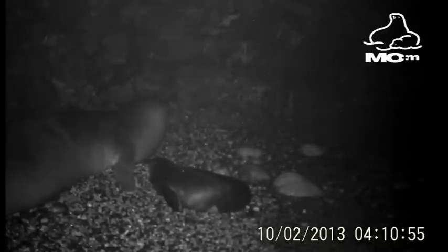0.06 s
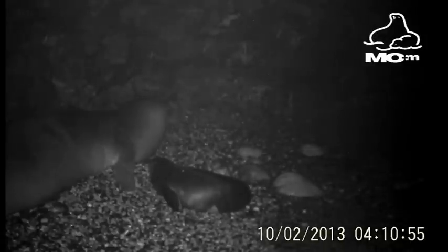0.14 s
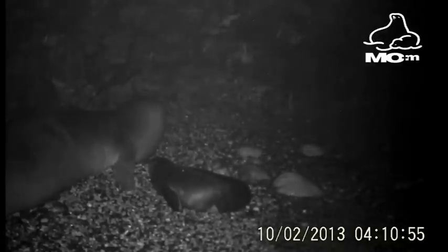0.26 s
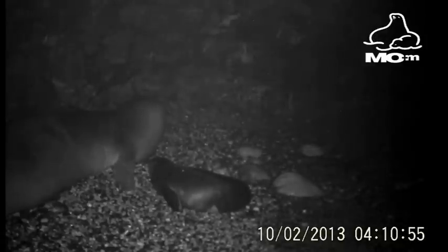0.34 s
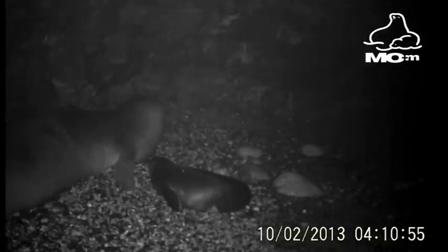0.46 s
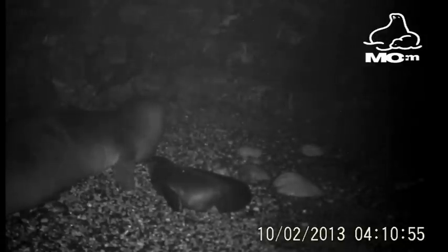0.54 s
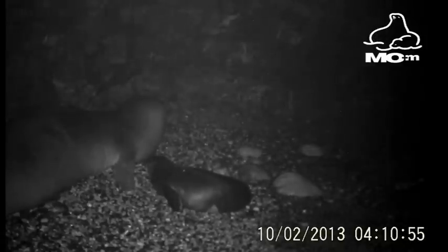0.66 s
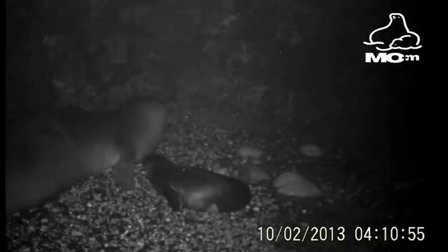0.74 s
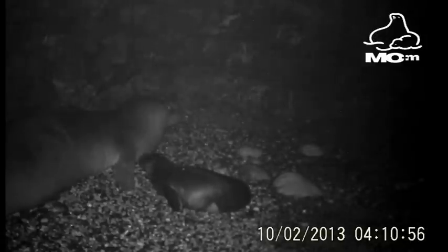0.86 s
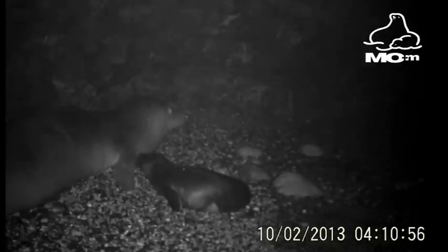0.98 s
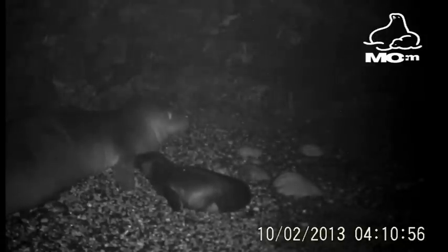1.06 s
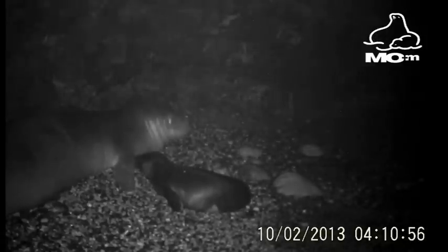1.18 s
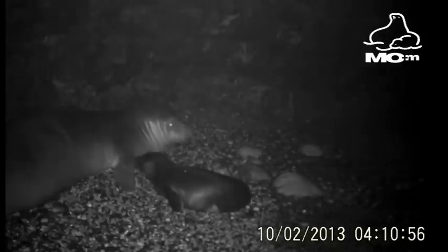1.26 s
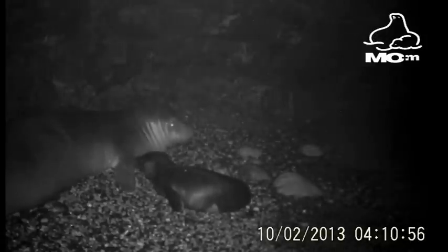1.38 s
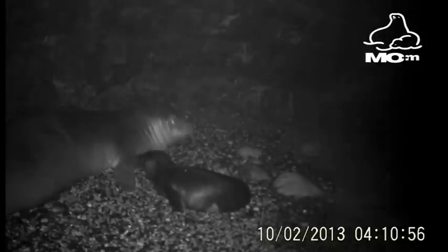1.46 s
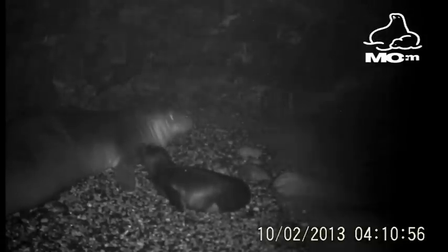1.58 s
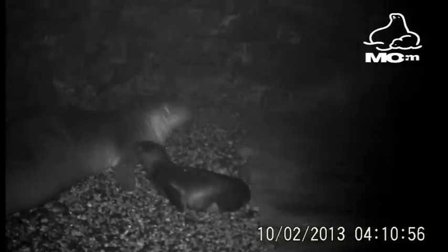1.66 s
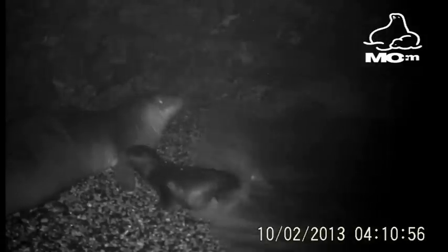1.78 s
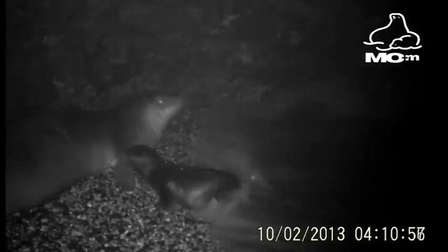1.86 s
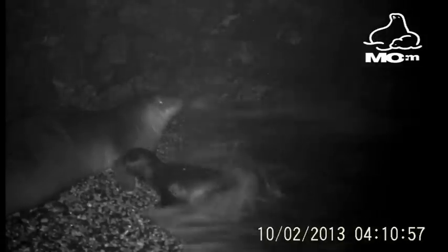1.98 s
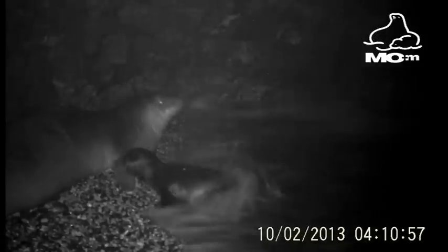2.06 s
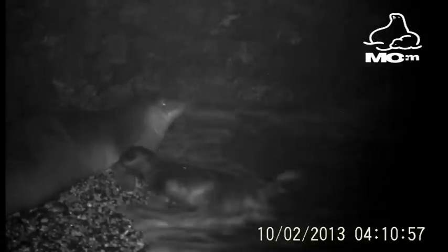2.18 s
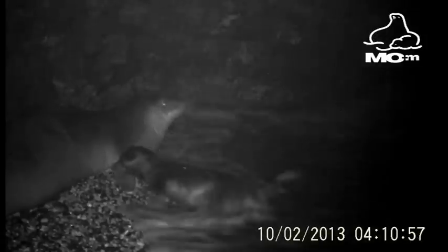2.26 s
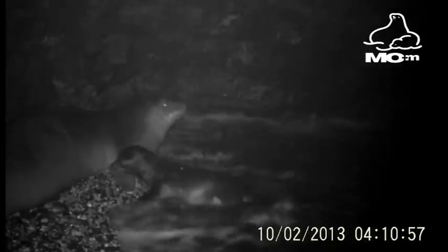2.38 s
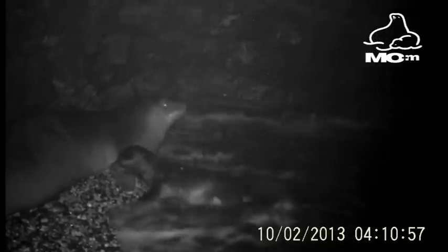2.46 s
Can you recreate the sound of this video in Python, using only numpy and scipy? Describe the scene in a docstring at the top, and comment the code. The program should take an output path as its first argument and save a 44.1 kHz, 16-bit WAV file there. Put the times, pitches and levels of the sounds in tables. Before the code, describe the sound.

A sea wave breaks inside a rocky cave: faint wash and low hum first, then a sudden hollow boom with thumps of trapped air, and foam hissing over pebbles before fading; one fixed microphone, dull top end.

```python
"""A low hum over faint wash is heard first, and it soon sinks; about a second in, a swell breaks in a sea cave.
Breaking water roars and booms, and trapped air pockets thump as brief damped sines with a dying echo tail.
The water washes up the pebbles: bubble pulses over noise, in third-octave bands, make the wash and spray hiss,
and also the roar, boom, hum and rumble. One microphone feeds both channels, steeply band-limited."""
import sys
import numpy as np
from scipy import signal
from scipy.io import wavfile

SR = 44100
rng = np.random.default_rng(int(sys.argv[2]) if len(sys.argv) > 2 else 0)


def materialize(psi):
    """Save the field psi as 16-bit PCM at rate SR to the path in sys.argv[1].

    A 1-D psi becomes a single channel; in a 2-D psi each row is a channel.
    """
    bounded = np.clip(np.atleast_2d(psi).T, -1, 1)
    quanta = np.round(bounded * 32767).astype(np.int16)
    wavfile.write(sys.argv[1], SR, quanta)


def volts_from_decibels(level):
    """Turn decibel levels (scalar or array-like) into linear amplitude factors."""
    exponent = np.asarray(level, float) / 20
    return 10 ** exponent


N = 112455   # length in samples


def rms_one(x):
    """Normalisation: equal mean power makes signals comparable."""
    return x / np.sqrt(np.mean(x ** 2) + 1e-20)


def in_time(rows):
    """Linear interpolation: each level column becomes one value per sample."""
    s, *columns = np.transpose(rows)
    return [np.interp(np.arange(N) / SR, s, c) for c in columns]


def drift(rate_hz):
    """Low-pass noise: two equal one-pole stages with corners at rate_hz leave slow chance of spread 1."""
    thin = 40   # one drift value per 40 samples
    settle = 2000   # start-up values thrown away
    pole = np.exp(-2 * np.pi * rate_hz * thin / SR)
    noise = rng.standard_normal(N // thin + settle + 2)
    slow = signal.lfilter([1], [1, -2 * pole, pole * pole], noise)[settle:]
    return np.interp(np.arange(N) / thin, np.arange(len(slow)), rms_one(slow))


def bursting():
    """Shot noise: random bubble pulses of uneven size and either sign over a bed of noise."""
    bubbles_per_s, spread_db = 6000, 2.5
    sizes = volts_from_decibels(spread_db * np.minimum(rng.exponential(1, N), 5)) * rng.choice([-1, 1], N)
    bursts = sizes * (rng.random(N) < bubbles_per_s / SR)
    return rms_one(bursts) + rng.standard_normal(N)


def water(colour, patchy_db, shared, flicker_hz):
    """Bubble resonance: size sets pitch, so third-octave bands swell partly alone, partly together; rms 1."""
    hz, db = np.transpose(colour)
    edges = 12 * 2 ** np.arange(0, 10.1, 1 / 3)
    together = drift(flicker_hz)
    sources = [bursting(), bursting()]   # neighbouring bands take different sources
    out = 0
    for k, (low, high) in enumerate(zip(edges, edges[1:])):
        centre = np.sqrt(low * high)
        if hz[0] * .7 < centre < hz[-1] * 1.4:
            bandpass = signal.butter(2, [low, high], "band", fs=SR, output="sos")
            band = signal.sosfilt(bandpass, sources[k % 2])
            colour_db = np.interp(np.log(centre), np.log(hz), db)
            swelling_db = patchy_db * (shared * together + drift(flicker_hz))
            out = out + band * volts_from_decibels(colour_db + swelling_db)
    return rms_one(out)


# low hum and rumble in the cave, wavering by chance: t/s, deepest rumble level/dB, hum level/dB
HUM_LEVELS = [(0, -42, -38), (.16, -46, -65), (.24, -43, -44), (.42, -35, -51.5), (.5, -42, -53),
              (.75, -46, -57), (.9, -45, -60), (1.0, -46, -34.5), (1.15, -44, -36.5), (1.23, -55, -42),
              (1.33, -45, -36), (1.5, -42, -40), (1.62, -50, -49), (1.85, -56, -46.5), (2.15, -52, -56),
              (2.28, -50, -42), (2.55, -58, -51.5)]
# relative spectral density of the rumble and of the hum: f/Hz, level/dB per Hz
RUMBLE_SPECTRUM = [(12, 3), (20, -9), (38, 5), (50, -16.5), (70, -40)]
HUM_SPECTRUM = [(35, -25), (48, 1), (63, 1.5), (80, -11.5), (110, -31.5)]


def cave_hum():
    """Band-limited noise: the cave's low hum and deepest rumble waver irregularly, the hum strongest near 1 s."""
    rumble_db, hum_db = in_time(HUM_LEVELS)
    rumble = volts_from_decibels(rumble_db) * water(RUMBLE_SPECTRUM, patchy_db=1.5, shared=.6, flicker_hz=6.0)
    hum = volts_from_decibels(hum_db) * water(HUM_SPECTRUM, patchy_db=1.2, shared=.6, flicker_hz=6.0)
    return rumble + hum


# foam running up the pebbles: t/s, wash level/dB, spray hiss level/dB
FOAM_LEVELS = [(0, -43, -42.5), (.1, -42, -42.5), (.4, -41, -39.5), (.48, -38, -38), (.79, -35.5, -35.5),
               (.9, -31, -33), (1.01, -27, -30), (1.05, -28, -32), (1.2, -29.5, -31), (1.41, -28, -31),
               (1.46, -29.5, -35), (1.52, -30.5, -33), (1.57, -28.5, -34.5), (1.68, -31, -35.5),
               (1.75, -29.5, -34.5), (1.83, -30.5, -34), (1.92, -31, -36), (2.0, -31.5, -37.5),
               (2.2, -34.5, -42), (2.36, -39, -45.5), (2.46, -40, -42.5), (2.55, -39.5, -41.5)]
# relative spectral density of the wash and of the spray hiss: f/Hz, level/dB per Hz
WASH_SPECTRUM = [(350, -30.5), (600, -12), (664, -8), (1020, -1.5), (1100, -1.5), (1200, 0.5), (2450, -2.5),
                 (4500, -13), (5850, -41), (9900, -120)]
SPRAY_SPECTRUM = [(1650, -28), (2800, 0), (4000, -1), (5500, -2), (7000, -6), (9000, -9.5), (11000, -15)]


def foam():
    """Superposition of countless small bubbles: a mid-range wash below a spray hiss."""
    wash_db, spray_db = in_time(FOAM_LEVELS)
    wash = volts_from_decibels(wash_db) * water(WASH_SPECTRUM, patchy_db=0.45, shared=0.51, flicker_hz=11.0)
    spray = volts_from_decibels(spray_db) * water(SPRAY_SPECTRUM, patchy_db=0.5, shared=0.8, flicker_hz=8.3)
    return wash + spray


# breaking water: t/s, cave boom level/dB, roar level/dB
BREAKER_LEVELS = [(0, -48, -44), (.07, -41.5, -42), (.3, -42.5, -40.5), (.52, -40.5, -40),
                  (.68, -41, -37.5), (.8, -38.5, -38.5), (.88, -35.5, -33), (.98, -32, -30),
                  (1.02, -30, -25), (1.09, -27, -31), (1.16, -32, -30.5), (1.25, -35, -30.5),
                  (1.38, -32.5, -29.5), (1.45, -36.5, -34.5), (1.64, -44, -37), (1.75, -41.5, -41),
                  (1.83, -41.5, -32.5), (1.95, -39, -36), (2.15, -39.5, -41.5), (2.4, -47, -42),
                  (2.55, -46.5, -43)]
# relative spectral density of the boom and of the roar: f/Hz, level/dB per Hz
BOOM_SPECTRUM = [(70, -26), (100, -9), (125, -4.5), (150, -9.5), (215, -0.5), (265, -5), (320, -10.5),
                 (450, -30)]
ROAR_SPECTRUM = [(180, -30.5), (300, -9), (339, -2.5), (494, -2), (589, -2), (710, -5.5), (1000, -6.5),
                 (1300, -40), (2200, -120)]


def breaking_water():
    """Spectral shaping: the water's roar and the cave's lower boom are noise under separate envelopes."""
    boom_db, roar_db = in_time(BREAKER_LEVELS)
    boom = volts_from_decibels(boom_db) * water(BOOM_SPECTRUM, patchy_db=1.55, shared=0.38, flicker_hz=3.7)
    roar = volts_from_decibels(roar_db) * water(ROAR_SPECTRUM, patchy_db=0.57, shared=0.21, flicker_hz=19.0)
    return boom + roar


# air pockets slammed shut: onset t/s, envelope peak level/dB, pitch f/Hz, time to peak t/s
AIR_POCKETS = [(1.002, -13, 185, .005), (0.991, -20, 280, .006), (1.328, -22, 165, .007),
               (1.914, -27, 260, .006), (1.362, -23, 225, .006), (0.22, -34, 200, .009),
               (0.34, -32, 40, .025), (0.994, -26, 590, .004), (1.018, -21, 265, .012),
               (1.022, -27, 47, .02), (1.05, -22, 250, .014), (1.095, -25, 240, .012),
               (1.135, -27, 52, .018), (1.252, -24, 350, .008), (1.29, -24, 65, .022),
               (1.358, -26, 62, .02)]


def thumps():
    """Damped oscillation: each squeezed air pocket rings at its pitch, peaks and dies away."""
    out = np.zeros(N)
    for s, db, hz, rise in AIR_POCKETS:
        t = np.maximum(np.arange(N) / SR - s, 0)
        envelope = t / rise * np.exp(1 - t / rise)   # reaches 1 at the rise time
        out += volts_from_decibels(db) * envelope * np.sin(2 * np.pi * hz * t)
    return out


def cave(x):
    """Diffuse reverberation: rough rock walls scatter the sound into a dense, exponentially dying tail."""
    t60_s, first_echo_s, level_db = 0.48, 0.011, -15.5
    t = np.arange(SR) / SR
    tail = rng.standard_normal(SR) * volts_from_decibels(-60 * t / t60_s) * (t > first_echo_s)
    tail = tail / np.sqrt(np.sum(tail ** 2))   # unit energy
    return volts_from_decibels(level_db) * signal.fftconvolve(x, tail)[:N]


def scene():
    """Linear superposition: all layers add, the same on both channels; only the thumps echo."""
    blows = thumps()
    sea = breaking_water() + foam() + cave_hum() + blows + cave(blows)
    return np.array([sea, sea])


def band_limit(x):
    """A steep low-pass at the top of the band."""
    return signal.sosfilt(signal.butter(12, 11130, fs=SR, output="sos"), x)


def record(dry):
    """Band limitation: a steep linear-phase low-pass cuts the top; the converter adds a steady offset."""
    cutoff_hz, offset = 10060, .0026
    lowpass = signal.firwin(701, cutoff_hz, window=("kaiser", 7.5), fs=SR)
    cut = signal.fftconvolve(dry, [lowpass], "same", axes=1)
    mix = cut + offset
    return band_limit(mix)


dry = scene()
out = record(dry)
materialize(out)
```